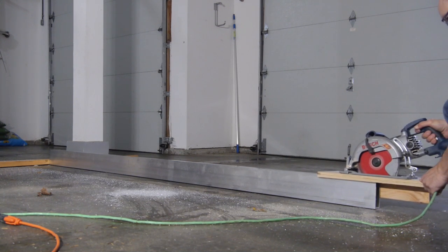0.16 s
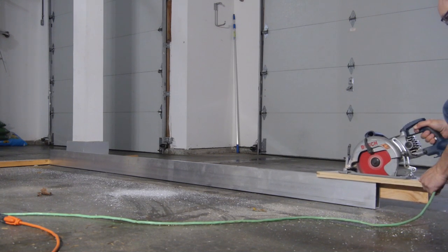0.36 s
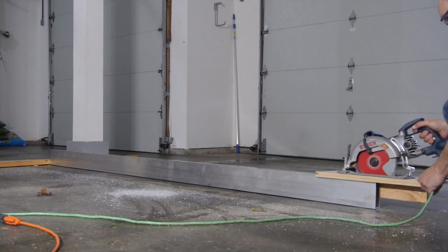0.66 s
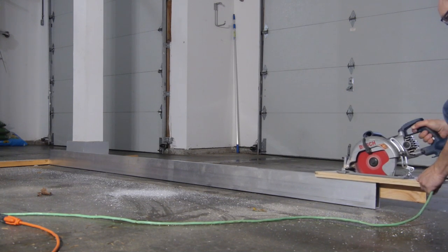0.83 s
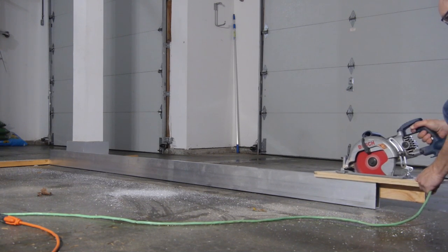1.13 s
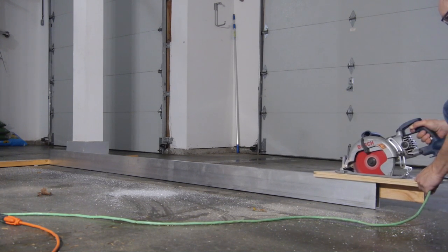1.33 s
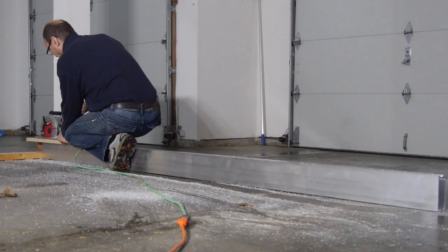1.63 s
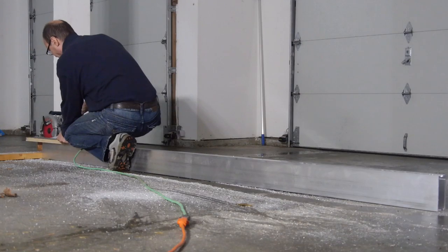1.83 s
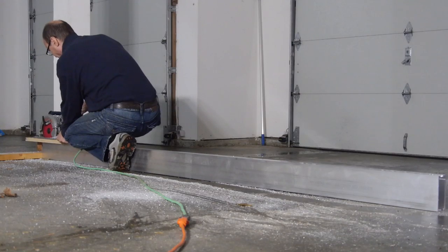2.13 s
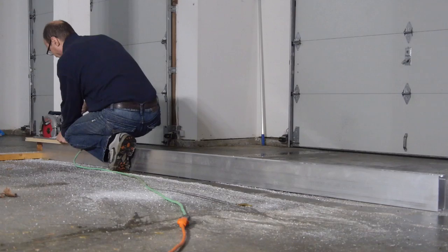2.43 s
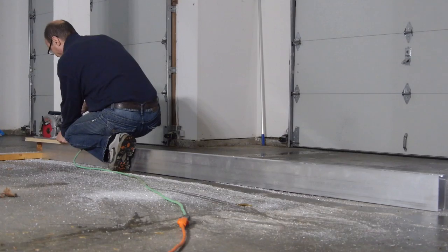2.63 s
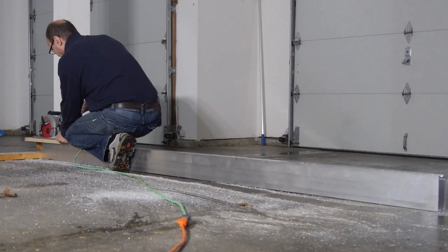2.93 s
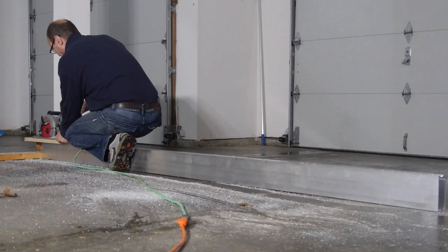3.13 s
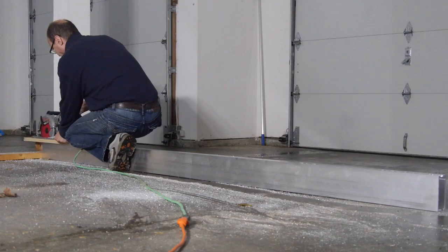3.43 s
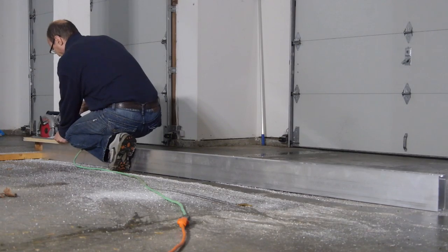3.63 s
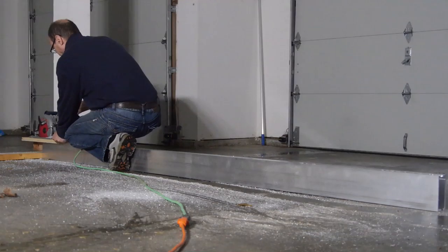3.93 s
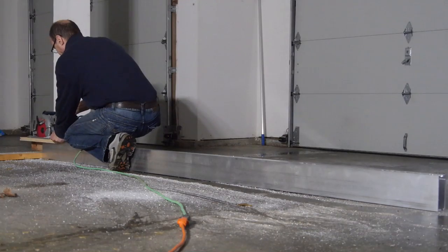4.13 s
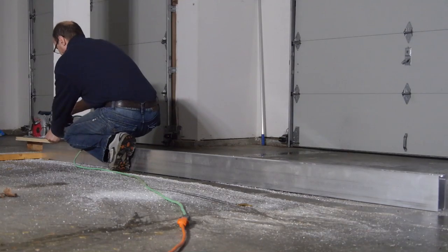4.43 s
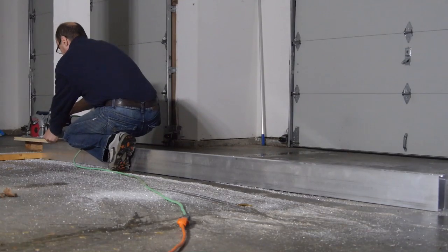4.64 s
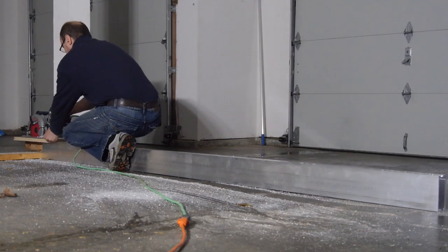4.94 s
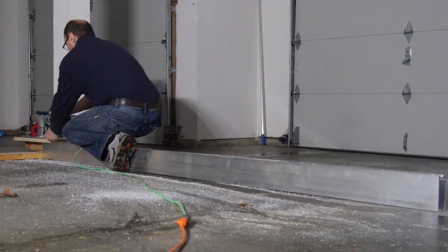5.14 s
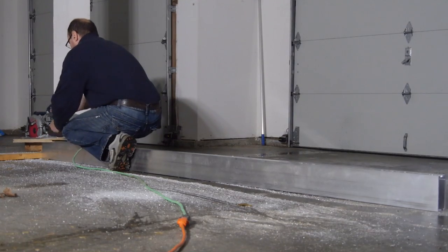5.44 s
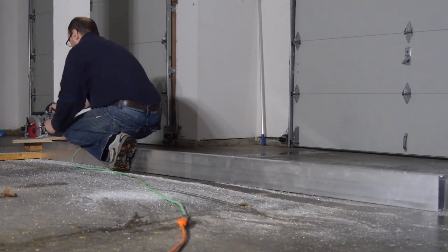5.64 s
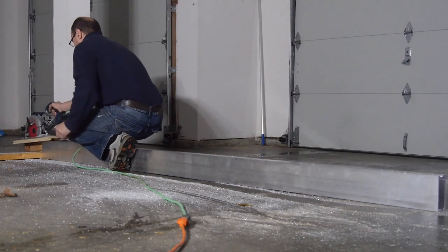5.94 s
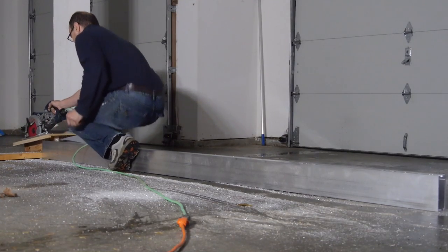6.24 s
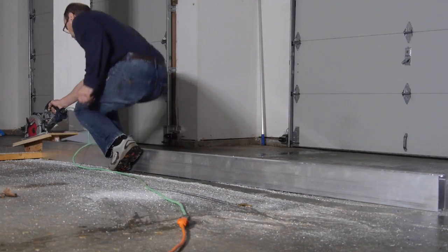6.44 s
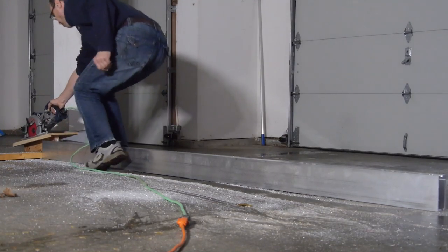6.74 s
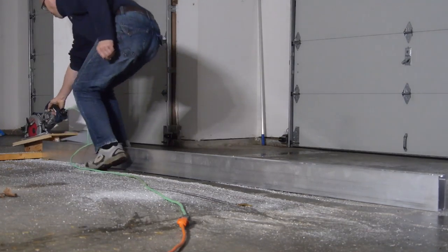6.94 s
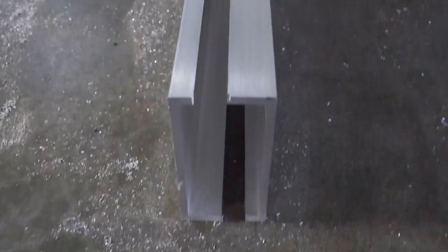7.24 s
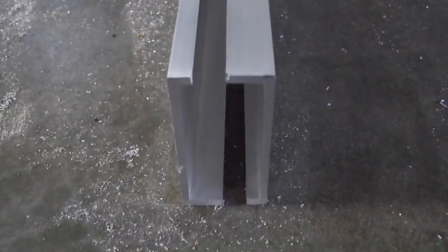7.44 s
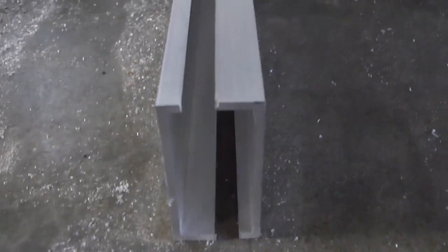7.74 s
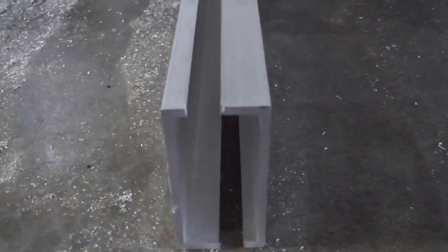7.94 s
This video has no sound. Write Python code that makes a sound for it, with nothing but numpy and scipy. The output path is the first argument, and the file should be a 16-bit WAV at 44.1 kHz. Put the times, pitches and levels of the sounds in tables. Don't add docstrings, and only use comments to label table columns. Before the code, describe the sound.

In a bare concrete garage a circular saw roars free, bites shrilly through metal tubing, speeds up, coasts down, then near silence with a faint rustle.

```python
import sys
import numpy as np
from scipy import signal
from scipy.fft import rfft, irfft, next_fast_len
from scipy.io import wavfile

SR = 44100
rng = np.random.default_rng(int(sys.argv[2]) if len(sys.argv) > 2 else 0)


def decibels_to_gain(level_db):
    exponent = np.asarray(level_db, float) / 20
    return 10 ** exponent


def bounce(signal):
    frames = np.transpose(np.atleast_2d(signal))
    limited = np.clip(frames, -1, 1)
    pcm = np.round(limited * 32767).astype(np.int16)
    wavfile.write(sys.argv[1], SR, pcm)


N = 356328
TEETH, SLOTS_A_TURN = 56, 4
MOVES_S = (1.49, 6.994)


def at_hz(points, hz):
    table = np.array(points)
    return np.interp(np.log(hz + 1), np.log(table[:, 0]), table[:, 1])


def rms_one(x):
    return x / np.sqrt(np.mean(x ** 2) + 1e-20)


def drift(rate_hz, size):
    knots = rng.standard_normal(int(size / SR * 80) + 3)
    return np.interp(np.arange(size) / SR * rate_hz, np.arange(len(knots)), knots)


def humps(peaks, hz):
    return sum(decibels_to_gain(db) / (1 + 2j * (hz - top_hz) / width_hz) for top_hz, width_hz, db in peaks)


def ramp(start_s, end_s):
    return np.clip((np.arange(N) / SR - start_s) / max(end_s - start_s, .001), 0, 1)


def bell(s, length_s):
    return np.exp(-np.minimum((2 * (np.arange(N) / SR - s) / length_s) ** 2, 50))


def mix(*pairs):
    return sum(np.array(weights)[:, None] * control for weights, control in pairs)


# f/Hz, level/dB rms
IDLE_LINES = [(947.5, -43), (737, -49), (864, -51), (1052, -49), (1236, -45), (1863, -52), (2051, -53),
              (2552, -49), (2710, -49), (2842, -48), (3155, -50), (3607, -50), (5085, -53), (5443, -52)]
GEAR_SINGS_S = (0.16, 0.75)


def idle_tones():
    size = round(MOVES_S[0] * SR)
    t = np.arange(size) / SR
    total = np.zeros(size)
    for hz, db in IDLE_LINES[1:]:
        gain = decibels_to_gain(db + 3 * drift(8, size))
        total += gain * np.sin(2 * np.pi * hz * t + 1.2 * drift(22, size))
    (hz, db), (a, b) = IDLE_LINES[0], GEAR_SINGS_S
    held = (ramp(0, a) - ramp(b - .04, b + .04))[:size]
    gain = decibels_to_gain(db - 6 + 12 * held + 2 * drift(14, size))
    total += gain * np.sin(2 * np.pi * hz * t + .6 * drift(14, size))
    return np.pad(np.sqrt(2) * total, (0, N - size))


GARAGE_T60_S, GARAGE_DB, TAIL_SHARED = 1.23, -9, .8


def garage(x, sent=0):
    t = np.arange(SR) / SR
    tails = rng.standard_normal((2, SR)) + TAIL_SHARED * rng.standard_normal(SR)
    tails = tails * decibels_to_gain(-60 * t / GARAGE_T60_S) * (t > .008)
    tails = tails / np.sqrt(np.sum(tails ** 2, axis=1, keepdims=True))
    return x + decibels_to_gain(GARAGE_DB) * signal.oaconvolve((x + sent)[None], tails, axes=1)[:, :N]


# f/Hz, likeness/0-1
LIKENESS = [(60, 0.24), (180, 0.95), (550, 0.7), (1650, 0.83), (4970, 0.73), (15000, 0.35)]
# f/Hz, depth/dB
RIPPLE = [(100, 2.6), (2500, 2.2), (5000, 1.4), (15000, 1.2)]
RIPPLE_SPACING_HZ = 25.91
LUMPY_DB = [4, .6, .4, .5]
LUMPS_PER_S = 12
SPLIT_HZ, QUIET_SPLIT_HZ = (260, 1600, 6500), (260, 1600, 9000)


def roar(start_s, end_s, levels_db, colour, peaks, lift_db, flicker_db, pan=((100, 0), (200, 0)), edges=SPLIT_HZ):
    a, b = round(start_s * SR), min(round(end_s * SR), N)
    length = b - a
    size = next_fast_len(length)
    hz = np.fft.rfftfreq(size, 1 / SR)
    alike = np.clip(at_hz(LIKENESS, hz), 0, 1)
    mid, side = rfft(rng.standard_normal((2, size)))
    pair = np.sqrt(1 + alike) * mid + np.sqrt(1 - alike) * side * [[1], [-1]]
    pair = pair * decibels_to_gain(at_hz(colour, hz) + at_hz(pan, hz) * [[.5], [-.5]])
    pair = pair * np.sqrt(1 + np.abs(decibels_to_gain(lift_db) * humps(peaks, hz)) ** 2)
    modes = rng.standard_normal(2400)
    pair = pair * decibels_to_gain(at_hz(RIPPLE, hz) * np.interp(hz / RIPPLE_SPACING_HZ, np.arange(len(modes)), modes))
    below = [1 / (1 + (hz / edge) ** 6) for edge in edges]
    shares = below[0], below[1] - below[0], below[2] - below[1], 1 - below[2]
    out, together = np.zeros((2, N)), drift(14, length)
    for share, level_db, lumpy_db in zip(shares, levels_db, LUMPY_DB):
        flicker = flicker_db * (together + 0.28 * drift(30.1, length))
        flicker = flicker + lumpy_db * drift(LUMPS_PER_S, length)
        noise = irfft(pair * np.sqrt(share), size)[:, :length]
        out[:, a:b] += decibels_to_gain(level_db[a:b] + flicker) * rms_one(noise)
    return out


IDLE_DB = [-75, -35.5, -28, -35]
# f/Hz, level/dB
IDLE_COLOUR = [(59, -82), (100, -32), (205, -19.5), (642, -11), (713, -2), (939, -9), (1000, -7),
               (1260, -5.5), (1460, -11.5), (2760, -6.5), (7930, -10), (10200, -2.5), (15600, -8.5)]
# f/Hz, width/Hz, level/dB
IDLE_PEAKS = [(1223, 53, -6), (1267, 34, 0.5), (2010, 100, -5), (2710, 89, -2.5), (2890, 52, -1.5),
              (3770, 27, 2), (5030, 77, -2), (5290, 140, -4), (5440, 70, -2)]


def idle_roar():
    levels_db = mix((IDLE_DB, np.ones(N)))
    return roar(0, MOVES_S[0], levels_db, IDLE_COLOUR, IDLE_PEAKS, lift_db=4.5, flicker_db=1.0)


# t/s, teeth passing/Hz, feed pressure/dB
WORK = [(1.49, 2068, 2), (1.65, 2010, 1), (1.8, 1945, 1.5), (1.93, 1816, 1.5), (2.05, 1762, -2),
        (2.15, 1820, 0), (2.3, 1969, -2), (2.44, 2296, -1.5), (2.55, 2457, -1), (2.64, 2526, -2.5),
        (2.85, 2695, -5.5), (3.1, 2792, -3.5), (3.3, 2812, -2.5), (3.6, 2879, -6), (4.05, 2953, -4),
        (4.15, 2953, -2), (4.35, 3007, -1.5), (4.55, 3054, -1)]
POWER_OFF_S, FADE_S = 4.55, 0.19
COAST_FROM_S, COAST_TAU_S, COAST_FLOOR_HZ = 4.66, 1.72, 300
LOADED_HZ, FREE_HZ = 2300, 2560
THIN_WALL_S, THIN_EDGE_S = (2.42, 3.44), 0.16


def controls():
    t = np.arange(N) / SR
    work_s, work_hz, work_feed_db = np.transpose(WORK)
    rate, feed_db = np.interp(t, work_s, work_hz), np.interp(t, work_s, work_feed_db)
    late = np.maximum(t - COAST_FROM_S, 0)
    rate = COAST_FLOOR_HZ + (rate - COAST_FLOOR_HZ) * np.exp(-late / COAST_TAU_S)
    off = ramp(POWER_OFF_S - FADE_S, POWER_OFF_S + FADE_S)
    load = np.clip((FREE_HZ - rate) / (FREE_HZ - LOADED_HZ), 0, 1) * (off == 0)
    a, b = THIN_WALL_S
    thin = ramp(a - THIN_EDGE_S, a + THIN_EDGE_S) - ramp(b - THIN_EDGE_S, b + THIN_EDGE_S)
    return rate, feed_db, load, thin, off


# t/s, length/s, level/dB, second multiple below it/dB
FLARES = [(1.54, 0.059, -29, 14), (1.643, 0.083, -23.5, 21), (1.76, 0.079, -26, 13),
          (1.892, 0.073, -21.5, 17), (1.944, 0.016, -19, 20), (1.974, 0.017, -16.5, 20),
          (2.042, 0.065, -17, 24), (2.137, 0.045, -26.5, 19), (2.225, 0.051, -32, 3),
          (2.287, 0.051, -42, -14), (2.361, 0.032, -29, 0), (2.44, 0.025, -29, 9), (2.523, 0.034, -32, 11),
          (2.634, 0.049, -14.5, 10), (2.795, 0.11, -28, 11), (2.98, .08, -38, 10), (3.086, 0.069, -27, 15),
          (3.138, 0.064, -19.5, 31), (3.18, 0.06, -21.5, 26), (3.287, 0.043, -29, 10),
          (3.35, 0.065, -32, -1), (3.55, 0.15, -38, 18), (3.78, 0.076, -36, 14), (3.983, .11, -25.5, 19),
          (4.16, 0.068, -30, 3), (4.325, 0.091, -31, 8), (4.386, .04, -37, 8), (4.445, 0.079, -33, 6),
          (4.56, .04, -37, 3)]


def flares():
    return sum(decibels_to_gain([[db], [db - below_db]]) * bell(s, length_s) for s, length_s, db, below_db in FLARES)


WHINE_DB = [-44, -49, -63, -69, -71]
WHINE_LOADED_DB = [9, 12, 10, 0, 0]
WHINE_THIN_DB = [6, 8, 13, 25, 18]
THIRD_BELOW_DB = 10
WOBBLE_RAD, WOBBLE_LOADED_RAD, SLOT_WOBBLE_RAD = .35, .1, .15


def teeth(passed, flare, load, thin, off):
    turn = 2 * np.pi * passed / TEETH
    angle = 2 * np.pi * passed + 0.17 * drift(70, N)
    wobble = (WOBBLE_RAD + WOBBLE_LOADED_RAD * load) * np.sin(turn + drift(20, N))
    angle = angle + wobble * (1 - 3 * flare[0])
    angle = angle + SLOT_WOBBLE_RAD * load * (np.sin(SLOTS_A_TURN * turn) + drift(79, N))
    gains = decibels_to_gain(mix((WHINE_DB, 1), (WHINE_LOADED_DB, load), (WHINE_THIN_DB, thin))) * (1 - off)
    gains[:2] += flare
    gains[2] += decibels_to_gain(-THIRD_BELOW_DB) * flare[1] * thin
    out = np.zeros(N)
    for multiple, gain in enumerate(gains, 1):
        waver_db = 3 * drift(24.35, N) - 1
        if multiple == 1:
            waver_db = waver_db / 2
        blur = (multiple - 1) * (.4 + load) * drift(78, N)
        out += gain * decibels_to_gain(waver_db) * np.sin(multiple * angle + blur)
    return np.sqrt(2) * out


SMEAR_DB = [-46, -54, -57, -62]
SMEAR_LOADED_DB = [14, 15, 10, 0]
SMEAR_COAST_DB = [-47, -56, -64, -44]
SMEAR_WIDTHS_HZ = (170, 330, 190)
SMEAR_PATCHY_DB, GEAR_ORDER, GEAR_DIES_S = 2, 22, 5.4
# f/Hz, width/Hz, level/dB
BLADE_RINGS = [(3800, 700, 17), (4400, 500, 8), (5300, 400, 9), (1700, 400, 5)]
RINGS_IN_CUT = .45


def smear(passed, rate, feed_db, load, off):
    free_hz, loaded_hz, coast_hz = SMEAR_WIDTHS_HZ
    width_hz = free_hz + (loaded_hz - free_hz) * load + (coast_hz - free_hz) * off
    clock = np.cumsum(width_hz) * 2 / SR
    levels_db = mix((SMEAR_DB, 1 - off), (SMEAR_LOADED_DB, load), (SMEAR_COAST_DB, off))
    levels_db = levels_db + 0.2 * feed_db * (1 - off)
    levels_db[3] -= 25 * ramp(GEAR_DIES_S - .2, GEAR_DIES_S + 0.29)
    out = np.zeros(N)
    for multiple, level_db in zip((1, 2, 3, GEAR_ORDER / TEETH), levels_db):
        sway = rng.standard_normal((2, 9000))
        re, im = (np.interp(clock * multiple ** .5, np.arange(9000), v) for v in sway)
        angle = 2 * np.pi * multiple * passed
        ring_db = sum(db / (1 + (2 * (multiple * rate - hz) / width) ** 2) for hz, width, db in BLADE_RINGS)
        ring_db = ring_db * np.maximum(off, RINGS_IN_CUT)
        gain = decibels_to_gain(level_db + SMEAR_PATCHY_DB * drift(15, N) + ring_db)
        out += gain * (re * np.cos(angle) + im * np.sin(angle))
    return out


# f/Hz, width/Hz, level/dB
GUARD_RINGS = [(815, 30, 8), (960, 25, 10), (1200, 25, 9)]
# f/Hz, width/Hz, level/dB
STRANDS = [(1675, 20, 3), (1780, 14, 8), (1827, 16, 3), (1930, 20, 8), (2003, 20, 6), (2145, 22, 5),
           (2300, 20, 7), (2430, 17, 7), (2520, 22, 10), (2660, 26, 8), (2804, 22, 4), (3000, 16, 3),
           (3017, 18, 10),
           (3580, 31, 5.2), (3680, 35, 6), (3804, 28, 6), (3920, 24, 4), (4034, 23, 7.8),
                 (4090, 31, 5.9), (4280, 31, 5), (4400, 40, 6), (4450, 35, 5), (4766, 35, 4), (4938, 35, 4),
                 (5320, 49, 9.6), (5420, 40, 4), (5380, 35, 5)]
STRAND_DB = -2.5


def strands(x):
    peaks = GUARD_RINGS + STRANDS
    lift = np.sqrt(1 + np.abs(humps(peaks, np.fft.rfftfreq(N, 1 / SR))) ** 2)
    return decibels_to_gain(STRAND_DB) * irfft(rfft(x) * lift, N)


# f/Hz, width/Hz, level/dB
TUBE = [(391, 24, 1), (559, 17, 12.5), (616, 14, -4), (836, 35, 12), (977, 145, 13), (1180, 27, -1),
        (1600, 20, 1), (2010, 25, 15), (2062, 83, 22), (2562, 28, 29)]
CHATTER_DB = -43.5
BREAK_S, BREAK_LENGTH_S, BREAK_DB = 4.17, 0.12, 10


def chatter(passed, off):
    orders = np.arange(5, TEETH - 2)
    order_db = 7.2 * (orders % SLOTS_A_TURN == 0) + rng.normal(0, 1.1, len(orders))
    turn = np.zeros(513, complex)
    turn[orders] = decibels_to_gain(order_db) * np.exp(2j * np.pi * rng.random(len(orders)))
    pattern = irfft(turn)
    force = np.interp(passed / TEETH % 1 * 1024, np.arange(1025), np.append(pattern, pattern[0]))
    force = force * decibels_to_gain(2.4 * drift(9, N))
    shaken = irfft(rfft(force) * humps(TUBE, np.fft.rfftfreq(N, 1 / SR)), N)
    return decibels_to_gain(CHATTER_DB + BREAK_DB * bell(BREAK_S, BREAK_LENGTH_S)) * (1 - off) * rms_one(shaken)


# t/s, length/s, order/cycles a turn, level/dB
SINGS = [(1.72, 0.38, 28, -36.5), (2.5, 0.16, 19, -45), (2.86, 0.079, 40, -37.5), (3.15, 0.11, 19, -39),
         (3.25, 0.36, 11, -48), (3.65, 0.36, 19, -44), (3.85, 0.22, 12, -46), (3.95, 0.431, 8, -49.5),
         (3.4, 0.22, 24, -46), (4.17, 0.11, 36, -32.5), (4.2, .08, 47, -46), (4.31, 0.065, 36, -31),
         (4.31, 0.072, 45, -32), (4.17, .12, 48, -39), (4.3, .08, 56, -36), (4.2, .08, 32, -40),
         (4.34, .06, 52, -35), (4.2, .1, 44, -41), (4.45, 0.15, 22, -40), (3.0, 0.55, 8, -59.5),
         (2.75, .3, 12, -60), (3.1, 0.25, 47, -41), (1.8, 0.56, 16, -47.5), (4.5, 0.2, 19, -46),
         (3.6, 0.61, 16, -53), (2.85, .5, 11, -55.5), (3.65, 0.39, 11, -52), (3.75, .5, 20, -49),
         (3.8, 0.42, 6, -54.5), (4.0, 0.56, 19, -49), (2.8, .4, 21, -54), (1.7, .3, 15, -53),
         (3.3, .8, 40, -48), (3.8, .6, 49, -48)]


def sings(passed):
    t, out = np.arange(N) / SR, np.zeros(N)
    for s, length_s, order, db in SINGS:
        rough_level, rough_phase = drift(45, SR), drift(35, SR)
        near = np.arange(SR) + int(s * SR) - SR // 2
        swell = np.exp(-np.minimum((2 * (t[near] - s) / length_s) ** 4, 50))
        gain = np.sqrt(2) * swell * decibels_to_gain(db + 3.5 * rough_level)
        out[near] += gain * np.sin(2 * np.pi * order * passed[near] / TEETH + .9 * rough_phase)
    return out


CUT_DB = [-74, -34, -28.5, -35.5]
CUT_FEED = [.1, 0.71, 0.96, 0.69]
CUT_LOADED_DB = [3, 0.8, 0.3, -3]
CUT_THIN_DB = [1, -6.5, 0.8, 0.5]
CUT_FLARE = [.1, .1, 0.27, 1.7]
CUT_SAG_DB = [-2, -4.5, 2, -22]
# f/Hz, level/dB
CUT_COLOUR = [(59, -81), (100, -43), (378, -9.5), (467, -16.5), (827, -2.5), (1070, -5.5), (1630, -1.5),
              (2590, -1), (3200, -2.5), (5090, -1.5), (6990, -5), (10400, -1.5), (13400, -14.5),
              (15600, -12)]
# f/Hz, width/Hz, level/dB
CUT_PEAKS = [(202, 17, 5), (403, 16, 0), (556, 24, 1.5), (1245, 104, -1.5), (1614, 120, -1.5),
             (2260, 20, -2), (3740, 100, -4), (4070, 240, -4), (4940, 100, -1.5), (5280, 160, -5.5)]
SAG_S = (4.39, 4.59)


def cut_roar(passed, flare, feed_db, load, thin, off):
    rasp = 1 + 0.067 * np.sin(2 * np.pi * passed / TEETH)
    levels_db = mix((CUT_DB, 1), (CUT_FEED, feed_db), (CUT_LOADED_DB, load), (CUT_THIN_DB, thin),
                    (CUT_FLARE, 10 * flare[0]), (CUT_SAG_DB, ramp(*SAG_S)))
    noise = roar(MOVES_S[0], 5, levels_db, CUT_COLOUR, CUT_PEAKS, lift_db=4.5, flicker_db=0.6)
    return rasp * np.sqrt(1 - off) * noise


COAST_DB = [-71, -38, -31, -38.5]
COAST_SAG_DB = [-4.5, -0.5, -4, -5.5]
COAST_BACK_DB = [16, 0, 4, 4.5]
# f/Hz, level/dB
COAST_COLOUR = [(59, -94), (100, -103), (181, -16.5), (253, -23.5), (403, -7), (467, -11.5), (793, -2),
                (881, -5.5), (1590, -0.5), (4210, -5), (7760, -15.5), (10400, -14), (15600, -36)]
# f/Hz, width/Hz, level/dB
COAST_PEAKS = [(434.8, 20, -11), (813, 63, 3.5), (1187, 14, 5.5), (1560, 40, -12), (2500, 220, -3.5),
               (2920, 200, -7), (3742, 37, -8), (4110, 71, 2), (4950, 270, 4.5), (5370, 100, -3),
               (8510, 620, 0)]
# f/Hz, width/Hz, level/dB
LATE_COAST_PEAKS = [(815, 53, -2), (1250, 73, 2.5), (1630, 160, -0.5), (2290, 100, -1), (2760, 73, -3),
                    (3070, 91, 0), (3840, 40, 4), (4090, 112, 4), (4850, 310, 0.5), (5240, 90, -1)]
BACK_S = (5.5, 6.19)


def coast_roar(off):
    back = ramp(*BACK_S)
    levels_db = mix((COAST_DB, 1), (COAST_SAG_DB, ramp(*SAG_S)), (COAST_BACK_DB, back))
    held = roar(4, 6.4, levels_db, COAST_COLOUR, COAST_PEAKS, lift_db=1.5, flicker_db=1.05)
    late_roar = roar(5.3, MOVES_S[1], levels_db, COAST_COLOUR, LATE_COAST_PEAKS, lift_db=0.5, flicker_db=0.67)
    return np.sqrt(off * (1 - back)) * held + np.sqrt(back) * late_roar


QUIET_DB = [-62.5, -48.5, -47, -58]
QUIET_LATE_DB = [-1, 1, 0.5, -20]
SCUFF_DB = [.1, 2.6, 2.5, .1]
# f/Hz, level/dB
QUIET_COLOUR = [(29, -55), (50, -24), (113, -9.5), (269, -9), (350, -7), (467, -12), (623, -9), (703, -1.5),
                (792, -4.5), (2070, -9), (4160, -14.5), (4470, -17), (7960, -25), (12900, -24.5),
                (15600, -54)]
# f/Hz, width/Hz, level/dB
QUIET_PEAKS = [(4190, 88, 5.6), (4850, 180, 3), (5300, 50, 3.7), (11340, 500, 3.8)]
# f/Hz, level/dB
QUIET_PAN = [(60, -5), (240, 1.5), (950, -3), (3770, -2), (15000, -0.5)]
QUIET_TURN_S, SCUFF_S, SCUFF_LENGTH_S = (7.55, 7.87), 7.72, 0.091


def quiet_garage():
    levels_db = mix((QUIET_DB, 1), (QUIET_LATE_DB, ramp(*QUIET_TURN_S)), (SCUFF_DB, bell(SCUFF_S, SCUFF_LENGTH_S)))
    return roar(MOVES_S[1], 9, levels_db, QUIET_COLOUR, QUIET_PEAKS, lift_db=-2.5, flicker_db=-0.7,
                pan=QUIET_PAN, edges=QUIET_SPLIT_HZ)


# t/s, level/dB, f/Hz, half width/fraction of f
TICKS = [
    (7.54, -46, 6700, .12),
    (7.54, -48, 9000, .3),
    (7.575, -52, 8500, .3),
    (7.62, -54, 7000, .3),
    (7.72, -48, 3000, .4),
    (8.03, -48, 9700, .04),
]


def ticks():
    out, t = np.zeros(N), np.arange(900) / SR
    for s, db, hz, half in TICKS:
        band = signal.butter(2, [hz * (1 - half), hz * (1 + half)], "band", fs=SR, output="sos")
        puff = rms_one(signal.sosfilt(band, rng.standard_normal(len(t))))
        start = round(s * SR)
        out[start:start + len(t)] += decibels_to_gain(db) * puff * np.exp(-t / 0.0031)
    return out


BLADE_LOW_CUT_HZ, SMEAR_WET_DB = 220, 2


def scene():
    t, (far, gone) = np.arange(N) / SR, MOVES_S
    close = garage(idle_tones()) * (t < far) + idle_roar()
    rate, feed_db, load, thin, off = controls()
    passed, flare = np.cumsum(rate) / SR, flares()
    whine = teeth(passed, flare, load, thin, off)
    bands = strands((smear(passed, rate, feed_db, load, off) + 0.22 * whine) * (t > far))
    blade = 0.71 * whine + bands + chatter(passed, off) + sings(passed)
    low_cut = signal.butter(3, BLADE_LOW_CUT_HZ, "high", fs=SR, output="sos")
    blade = signal.sosfilt(low_cut, blade * ramp(far, far + .02))
    saw = garage(blade, decibels_to_gain(SMEAR_WET_DB) * bands) * (t < gone)
    cut = cut_roar(passed, flare, feed_db, load, thin, off)
    return close + saw + cut + coast_roar(off) + quiet_garage() + ticks()


# f/Hz, width/Hz, depth/0-1
NOTCHES = [(3980, 30, .8), (4642, 34, .7), (5540, 50, .78)]


def narrow_dips(x):
    hz = np.fft.rfftfreq(N, 1 / SR)
    dips = [1 - depth / (1 + 2j * (hz - top_hz) / width_hz) for top_hz, width_hz, depth in NOTCHES]
    return irfft(rfft(x) * np.prod(dips, axis=0), N)


RUMBLE_HZ, RUMBLE_DB, RUMBLE_QUIET_DB, RUMBLE_LUMPY_DB = 26.2, -67, -80, 3.5


def preamp_rumble():
    shared, own = rng.standard_normal(N), rng.standard_normal((2, N))
    rumble = signal.sosfilt(signal.butter(3, RUMBLE_HZ, fs=SR, output="sos"), shared + 2.0 * own)
    level_db = np.where(np.arange(N) < MOVES_S[1] * SR, RUMBLE_DB, RUMBLE_QUIET_DB)
    level_db = level_db + RUMBLE_LUMPY_DB * drift(2.8, N)
    return decibels_to_gain(level_db + 1.5) * rms_one(rumble)


def low_pass(x):
    return signal.sosfilt(signal.butter(12, 15740, fs=SR, output="sos"), x)


LOW_CUT_HZ, CUTOFF_HZ, CEILING, OFFSET = 90, 16300, .45, -0.0029


def record(dry):
    rounded = dry / (1 + (dry / CEILING) ** 6) ** (1 / 6)
    clean = signal.sosfilt(signal.butter(2, LOW_CUT_HZ, "high", fs=SR, output="sos"), rounded)
    clean = signal.sosfilt(signal.cheby2(10, 60, CUTOFF_HZ, fs=SR, output="sos"), narrow_dips(clean))
    return low_pass(clean + preamp_rumble() + OFFSET)


dry = scene()
out = record(dry)
bounce(out)
```